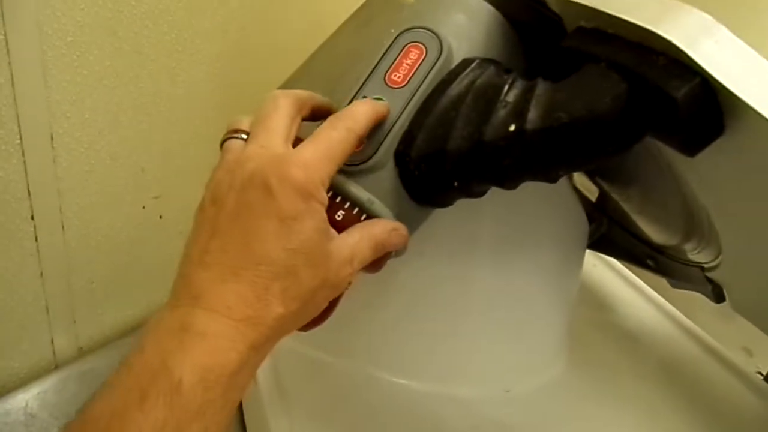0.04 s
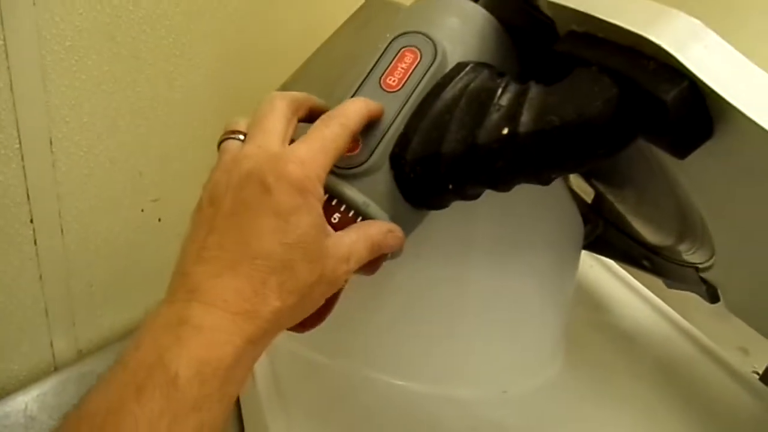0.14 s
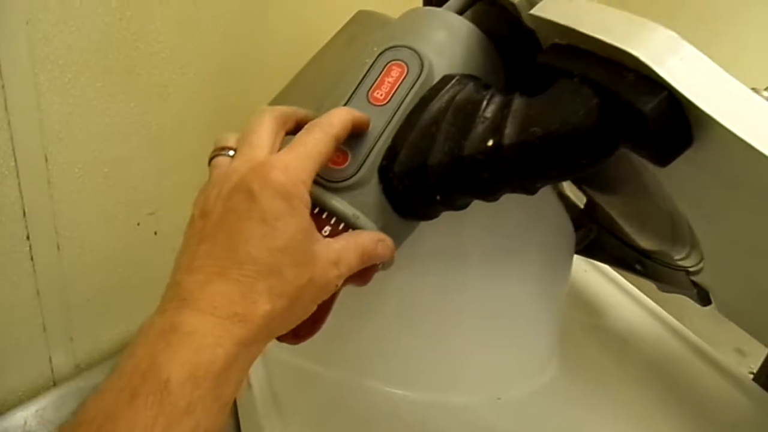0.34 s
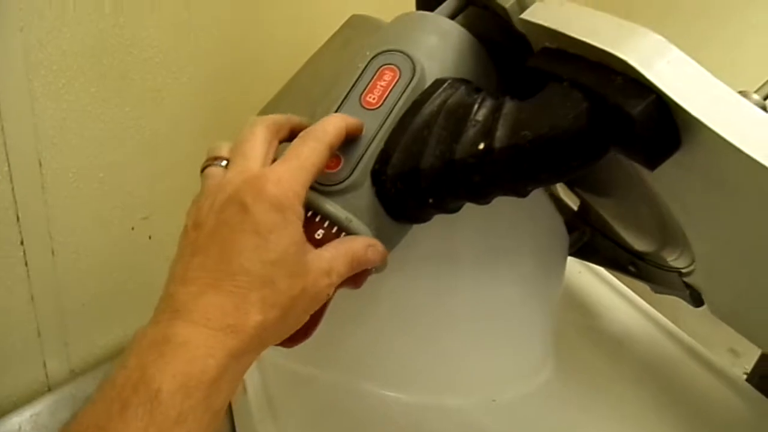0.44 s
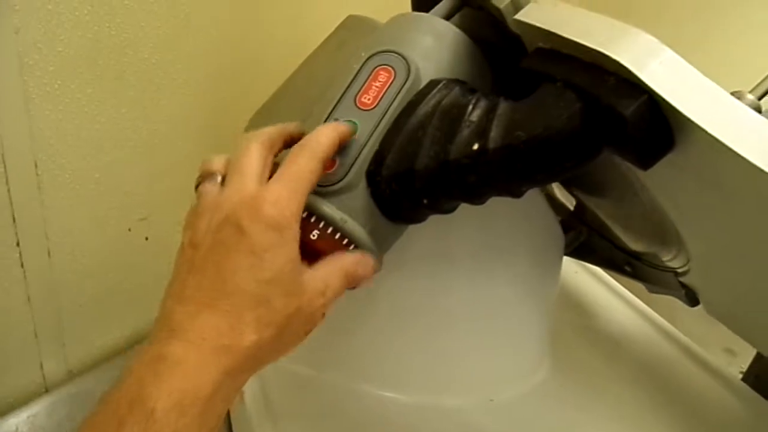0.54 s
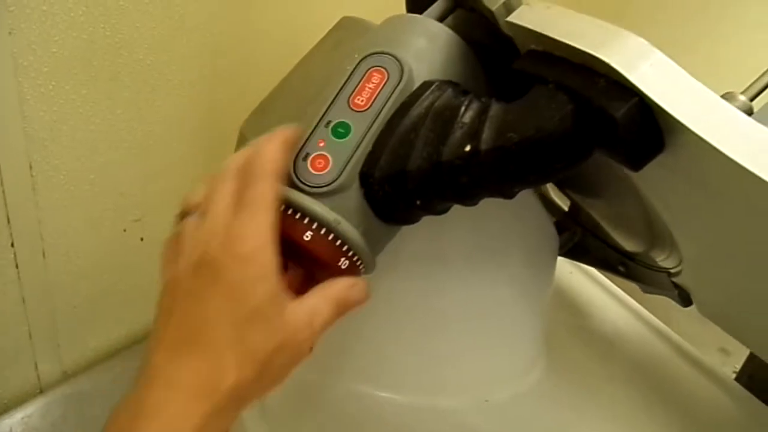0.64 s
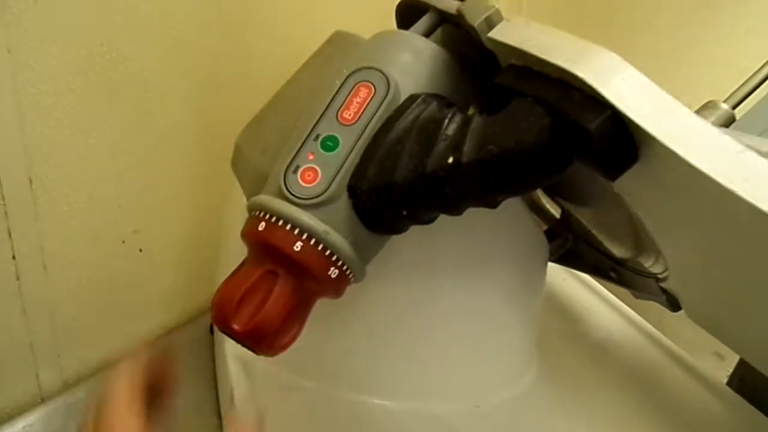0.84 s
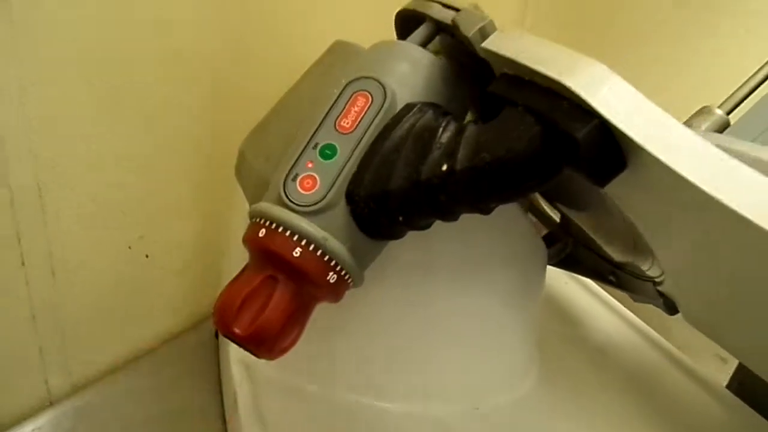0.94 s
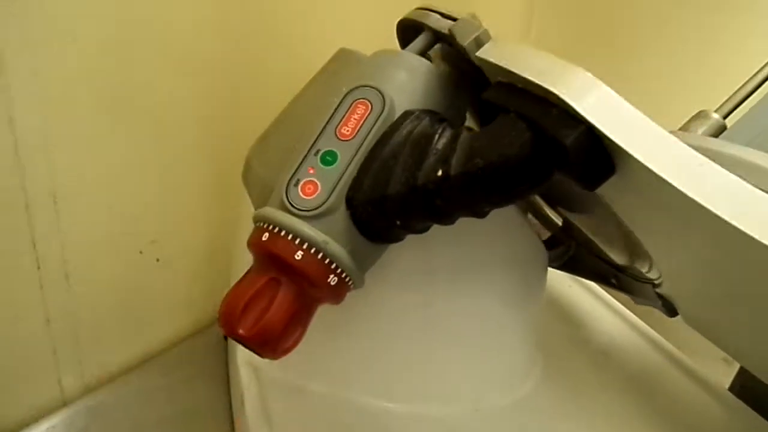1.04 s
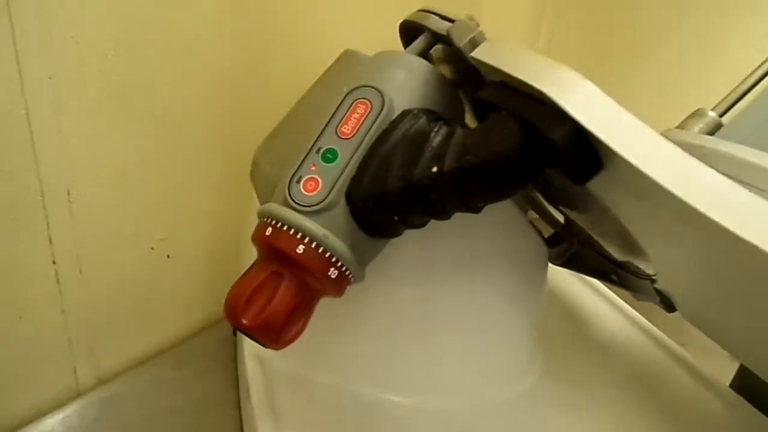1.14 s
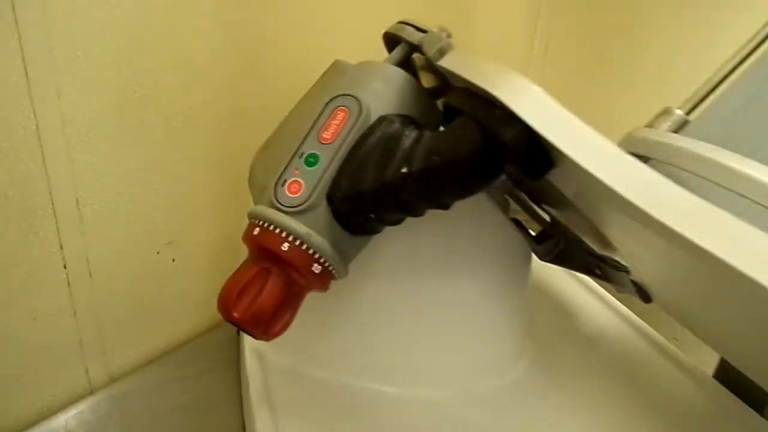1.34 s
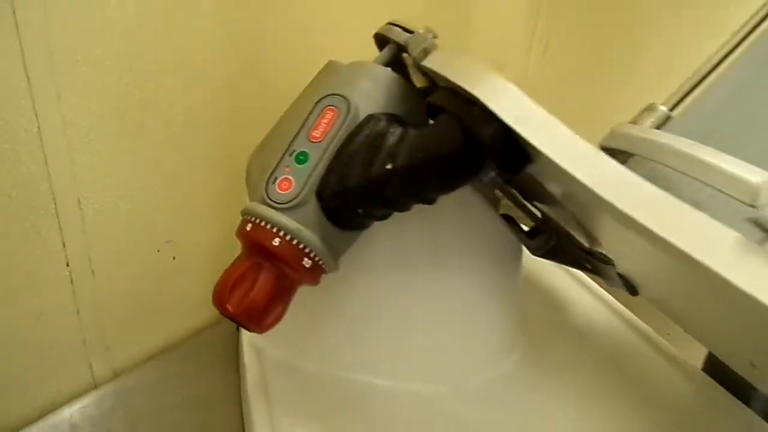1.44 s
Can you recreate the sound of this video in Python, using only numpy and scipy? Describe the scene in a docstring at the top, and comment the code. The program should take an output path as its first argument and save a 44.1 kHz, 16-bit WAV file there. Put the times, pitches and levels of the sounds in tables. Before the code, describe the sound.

A food slicer starts up close by in a small, quiet room. Its button ticks at about 0.15 seconds, then the starter snaps and the housing groans briefly, ending in a loud, bright clack and low thud near 0.3 seconds. From there until 1.5 seconds the motor runs, much softer than the clack, with a steady whirr and a buzzing hum and whine that gradually build.

```python
"""In a small quiet room, a food slicer is switched on close by.
The button ticks, the starter snaps in and the housing groans for an instant as the motor takes up speed.
A bright clack and a low thud end the start. The motor runs on with a magnetic buzz and a rotor whine
that grow louder, and the whirr of the blade drive. The room hums and murmurs faintly underneath."""
import sys
import numpy as np
from scipy import signal
from scipy.fft import rfft, irfft
from scipy.io import wavfile

SR = 44100
rng = np.random.default_rng(int(sys.argv[2]) if len(sys.argv) > 2 else 0)


def store_pcm(level_fs):
    """Save levels as 16-bit WAV."""
    pcm = np.round(np.clip(level_fs, -1, 1) * 32767).astype(np.int16)
    wavfile.write(sys.argv[1], SR, np.atleast_2d(pcm).T)


N = 66150
T = np.arange(N) / SR

# The room's hum and murmur, dipping after the loud clack: (time [s], hum level [dB], murmur level [dB])
BACKGROUND_LEVELS = [(0, -48.5, -54.5), (.25, -49, -51), (.45, -58, -55), (.85, -60, -62),
                     (1.5, -67.5, -52)]
# Tone colours of the room's murmur and air: (frequency [Hz], relative level [dB])
MURMUR_COLOUR = [(90, 2), (190, -3.5), (350, -1), (600, 1), (850, 2.5), (1150, -1), (1900, -11),
                 (3700, -17.5), (6000, -21)]
AIR_COLOUR = [(25, 2.5), (60, -16), (150, 27), (1000, -8), (4500, -9), (15500, -18)]
# How long the echo lasts: (frequency [Hz], time to fade by 60 dB [s])
ECHO_FADE = [(150, 0.27), (500, 0.29), (1400, 0.36), (3500, 0.37), (8000, 0.36), (15000, 0.17)]
# The falling whistle: (time [s], pitch [Hz], level [dB])
WHISTLE_PATH = [(1.0, 14800, -100), (1.12, 14000, -69), (1.35, 13100, -78), (1.45, 12100, -79),
                (1.5, 11600, -85)]
# Tone colours of the short starting noises: (frequency [Hz], relative level [dB])
BUTTON_COLOUR = [(200, -18), (900, -2), (1800, -9), (2400, -2.5), (3050, 2), (3500, -11), (5500, -15.5),
                 (8000, -26.5), (15000, -30)]
SNAP_COLOUR = [(40, -27), (120, -16), (300, 9), (700, 8), (1000, 10), (1300, -22), (1900, -19), (2500, 9),
               (3000, -3), (3650, -9.5), (4250, 7), (4700, 1), (5700, -0.5), (7200, -0.5), (8000, -1),
               (8700, -6), (10100, -13.5), (11900, 2), (13200, -6), (14200, 1), (15500, -10)]
CLACK_COLOUR = [(50, -24), (200, -20), (400, -21), (1000, -2.5), (1900, 0.5), (2700, -2), (3200, -2.5),
                (3700, -0.5), (5000, -8), (5950, 3), (6500, -4), (7900, -2), (8350, 3), (8800, 3.5),
                (9250, -6), (10450, -2), (11000, -2.5), (12800, 1.5), (13500, 3), (15500, 4)]
THUD_COLOUR = [(25, -14), (60, 0), (110, 9), (190, 19), (300, -29), (600, -27), (3000, -64)]
GRIT_COLOUR = [(60, -21), (130, 3.5), (400, 5), (900, 1.5), (1500, 2.5), (2600, -2), (3300, -13),
               (6500, -9), (9500, -21.5), (15000, -16.5)]
# Notes the switch and housing ring at: (pitch [Hz], relative level [dB], time to fade by 60 dB [s])
HOUSING_RINGS = [(122, -6, .18), (183, -4, .15), (277, -8, .15), (411, -13, .16), (511, -9, .2),
                 (722, -11, .15), (851, -15, .24), (1591, -9, .12), (2355, -9, .11), (5890, -10, .18),
                 (8380, -6, .1), (12800, -1, .08)]
# The clack and its bounce:
# (time [s], level [dB], treble tilt [dB per octave], time to fade by 60 dB [s], ring gain [dB])
CLACK_HITS = [(0.2850, -10.5, 0.5, 0.071, -22.5), (0.2946, -14.5, 2.5, 0.08, -26)]
# The groan of the housing: (time [s], level [dB], pitch [Hz])
GROAN_PATH = [(0.234, -59, 524), (0.237, -20, 526), (0.247, -28.5, 518), (.251, -17, 553),
              (0.265, -15.5, 560), (.275, -9.5, 560), (0.283, -14, 497), (0.295, -32.5, 532.5),
              (0.308, -40.5, 565.5), (.319, -22, 554), (0.326, -66, 543)]
# Tones in the groan: (multiple of its pitch, relative level [dB])
GROAN_TONES = [(1, -3), (2, -37), (3, -22.5)]
# The running motor: (time [s], buzz gain [dB], whine gain [dB], whirr gain [dB])
MOTOR_GAINS = [(.27, -66, -60, -67), (.33, -10.5, -12, -4.5), (.58, -5.5, -11.5, -6.5), (.88, -4, -5.5, -5),
               (1.05, -2.5, -2, -4), (1.2, -1, 1, -4.5), (1.33, 0, -1.5, -5), (1.5, .5, -3, -4.5)]
# Tones in the magnetic buzz: (multiple of the buzz rate, relative level [dB])
BUZZ_TONES = [(2, -62), (3, -57.5), (4, -44.5), (5, -50.5), (6, -54), (7, -59.5)]
# The rotor whine and its side tones: (steps of the mains rate from the whine, relative level [dB])
WHINE_TONES = [(-5, -56), (-4, -58), (-3, -61), (-2, -62), (-1, -66), (0, -42.5), (2, -57)]
# Tones of the blade drive and the colour of its whirr: (frequency [Hz], relative level [dB])
DRIVE_TONES = [(183, -59), (418, -60), (463, -58), (538, -55), (627, -58), (894, -65), (1340, -60),
               (1387, -57), (1459, -60), (1756, -63), (1788, -71), (2035, -64), (2126, -69), (2218, -72),
               (2309, -68), (2476, -67), (2498, -71), (2622, -69), (2681, -67), (2772, -72)]
WHIRR_COLOUR = [(60, -28), (140, -37), (200, 8.5), (310, -6.5), (450, 1.5), (600, 11.5), (800, -24),
                (950, -4), (1200, 1.5), (1450, 0), (1800, -11), (2650, -8.5), (3050, -15.5), (4000, -15.5),
                (5000, -21), (7300, -17), (10000, -21.5), (15500, -19.5)]

BUZZ_HZ, SHAFT_HZ, ROTOR_SLOTS = 119.9, 29.79, 48
MAINS_HZ = BUZZ_HZ / 2  # the magnet pulls twice in each cycle of the mains


def amp(db):
    """Turns decibels into a gain."""
    return 10 ** (np.asarray(db) / 20)


def unit(x):
    """Scales a signal to an average strength (rms) of 1."""
    return x / np.sqrt(np.mean(x ** 2) + 1e-20)


def look_up(table, hz):
    """Reads between the rows of a table, on a scale of octaves."""
    f, value = np.transpose(table)
    return np.interp(np.log(hz + 1), np.log(f), value)


def level(table, column):
    """Gain over time from one decibel column of a table."""
    rows = np.array(table)
    return amp(np.interp(T, rows[:, 0], rows[:, column]))


def noise(colour, tilt_db=0):
    """Noise of a given tone colour; the tilt brightens it by so many dB per octave."""
    hz = np.fft.rfftfreq(N, 1 / SR)
    coloured = unit(irfft(rfft(rng.standard_normal(N)) * amp(look_up(colour, hz)), N))
    tilt = amp(tilt_db * np.log2(np.maximum(hz, 1000) / 6000))
    return irfft(rfft(coloured) * tilt, N)


def drift(hz):
    """Random wavering, mostly slower than the given rate."""
    f = np.fft.rfftfreq(N, 1 / SR)
    return unit(irfft(rfft(rng.standard_normal(N)) / (1 + (f / hz) ** 2), N))


def strike(start_s, rise_s, fade_s):
    """The loudness of a hit: it rises quickly and fades by 60 dB in fade_s."""
    t = np.maximum(T - start_s, 0)
    return np.minimum(t / rise_s, 1) * np.exp(-np.log(1000) * t / fade_s)


def tones(rows, scatter=1):
    """Wavering tones from (pitch [Hz], level [dB]); little scatter keeps them in step, as pulses."""
    out = 0
    for hz, db in rows:
        strength = amp(db) * np.sqrt(2) * (1 + .09 * drift(20))
        phase = 2 * np.pi * (hz * T + scatter * rng.random()) + .09 * drift(20)
        out += strength * np.cos(phase)
    return out


def background():
    """The room's air, with a hum and murmur that dip after the clack; a thin tone ends before the snap."""
    thin_tone = tones([(3850, -72)]) * np.clip((.23 - T) / .017, 0, 1)
    hum = level(BACKGROUND_LEVELS, 1) * tones([(120.4, 0)])
    murmur = level(BACKGROUND_LEVELS, 2) * noise(MURMUR_COLOUR)
    return hum + murmur + thin_tone + amp(-62.5) * noise(AIR_COLOUR)


def room_echo(x):
    """Many reflections blur together, each band of pitch dying at its own speed."""
    size = SR // 2
    reflections = rng.standard_normal(size) * np.minimum(T[:size] / .0031, 1)
    hz, t, bands = signal.stft(reflections, SR, nperseg=256)
    fade = np.exp(-np.log(1000) * t / look_up(ECHO_FADE, hz)[:, None])
    tail = signal.istft(bands * fade, SR, nperseg=256)[1]
    return signal.fftconvolve(x, tail / np.linalg.norm(tail))[:N]


def whistle():
    """A faint, high whistle comes and goes, sliding down as the motor runs."""
    times, hz, _ = np.transpose(WHISTLE_PATH)
    pitch = np.interp(T, times, hz) + 90 * drift(80)
    flicker = unit(amp(6 * drift(15)))
    return level(WHISTLE_PATH, 2) * flicker * np.sqrt(2) * np.sin(2 * np.pi * np.cumsum(pitch) / SR)


def button():
    """The small plastic tick of the button going down."""
    tick = amp(-30) * noise(BUTTON_COLOUR) * strike(start_s=.1563, rise_s=.00016, fade_s=.033)
    return tick + amp(-9) * room_echo(tick)


def click(colour, rise_s, start_s, db, tilt_db, fade_s, ring_db):
    """A short, uneven, bright rattle that sets the housing ringing."""
    rattle = unit(amp(2 * drift(400)))
    out = amp(db) * noise(colour, tilt_db) * rattle * strike(start_s, rise_s, fade_s)
    for hz, note_db, ring_s in HOUSING_RINGS:
        ring = amp(ring_db + note_db - 3) * np.sin(2 * np.pi * hz * (T - start_s))
        out += ring * strike(start_s, rise_s + 1.3 / hz, ring_s)  # low notes build up more slowly
    return out


def switch():
    """The starter snaps in, and a brighter clack with a bounce ends the start."""
    snap = click(SNAP_COLOUR, rise_s=.0042, start_s=.2322, db=-19.5, tilt_db=0, fade_s=.072,
                 ring_db=-26.5)
    clacks = sum(click(CLACK_COLOUR, .0012, *hit) for hit in CLACK_HITS)
    return snap + clacks + amp(-11.5) * room_echo(snap + clacks)


def thud():
    """The heavy body booms briefly after the clack."""
    return amp(-31.5) * noise(THUD_COLOUR) * strike(start_s=.284, rise_s=.0089, fade_s=.16)


def groan(flutter_hz=86, flutter_peak_s=.2748):
    """The starting jolt shakes the housing: a fluttering, gritty tone that swells, dies and rebounds."""
    times, _, hz = np.transpose(GROAN_PATH)
    swell = level(GROAN_PATH, 1) * (T > times[0]) * (T < times[-1])
    flutter = 1 + .3 * np.cos(2 * np.pi * flutter_hz * (T - flutter_peak_s))
    phase = 2 * np.pi * np.cumsum(np.interp(T, times, hz)) / SR
    tone = swell * flutter * sum(amp(db) * np.sqrt(2) * np.cos(k * phase) for k, db in GROAN_TONES)
    grit = swell * amp(-11.5) * noise(GRIT_COLOUR)
    return tone + grit + room_echo(amp(-19.5) * tone + amp(-11.5) * grit)


def shaft_rub():
    """The same rough rub comes round with every turn of the shaft."""
    hz = SHAFT_HZ * np.arange(2, 150)
    sizes, offsets = rng.random((2, len(hz)))
    gains = sizes * amp(look_up(WHIRR_COLOUR, hz))
    return unit(sum(gain * np.cos(2 * np.pi * (f * T + offset))
                    for f, gain, offset in zip(hz, gains, offsets)))


def motor():
    """The magnet buzzes, the slots of the spinning rotor whine and the blade drive whirrs."""
    pulse = 1 + .1 * np.cos(2 * np.pi * BUZZ_HZ * T)
    rush = amp(-48) * noise(WHIRR_COLOUR) * pulse
    whirr = rush + amp(-47.5) * shaft_rub() + amp(1) * tones(DRIVE_TONES)
    buzz = tones([(k * BUZZ_HZ, db) for k, db in BUZZ_TONES], scatter=.22)
    whine = tones([(ROTOR_SLOTS * SHAFT_HZ + k * MAINS_HZ, db) for k, db in WHINE_TONES])
    return level(MOTOR_GAINS, 1) * buzz + level(MOTOR_GAINS, 2) * whine + level(MOTOR_GAINS, 3) * whirr


def scene():
    """Adds the slicer and the background into one channel."""
    return (button() + switch() + groan() + thud() + motor() + whistle() + background())[None]


def record(dry):
    """Cuts away the highest treble, above 15800 Hz."""
    treble_cut = signal.firwin(511, 15800, window=("kaiser", 9), fs=SR)
    return signal.oaconvolve(dry, treble_cut[None], "same")


dry = scene()
out = record(dry)
store_pcm(out)
```